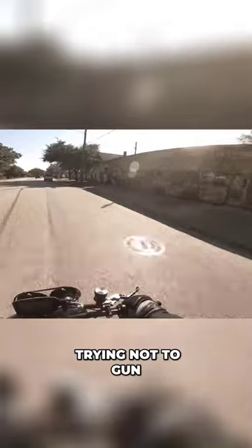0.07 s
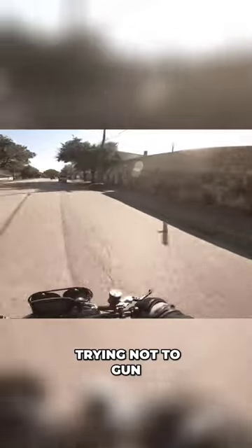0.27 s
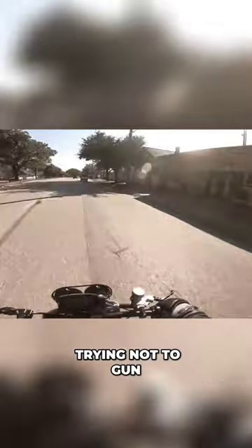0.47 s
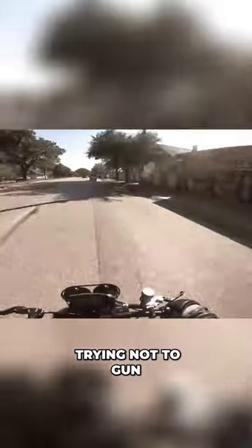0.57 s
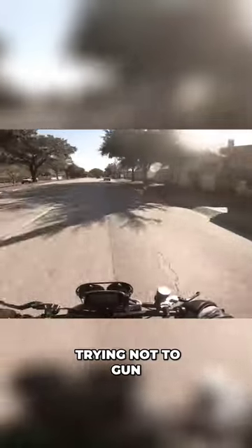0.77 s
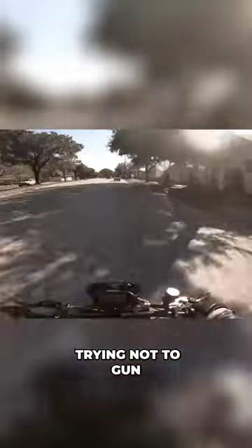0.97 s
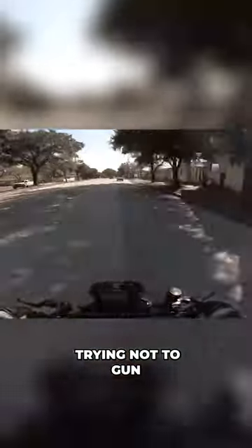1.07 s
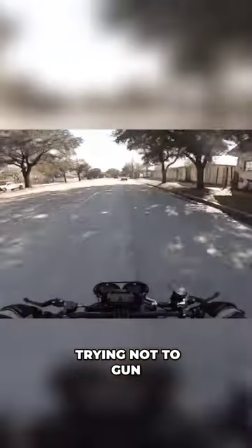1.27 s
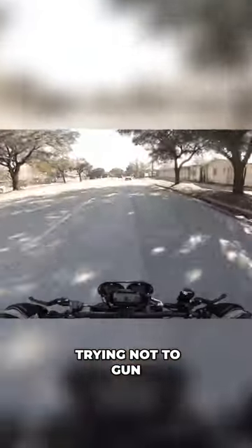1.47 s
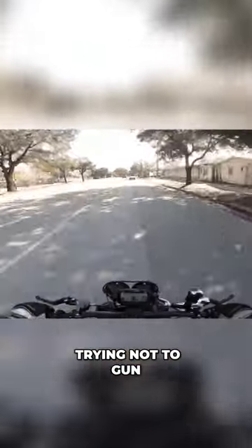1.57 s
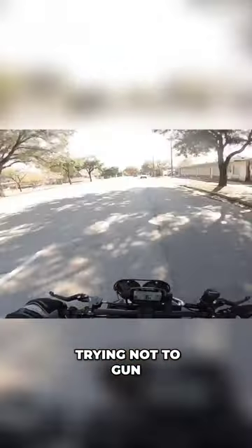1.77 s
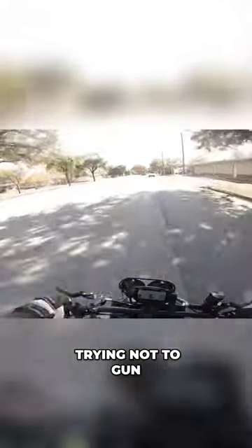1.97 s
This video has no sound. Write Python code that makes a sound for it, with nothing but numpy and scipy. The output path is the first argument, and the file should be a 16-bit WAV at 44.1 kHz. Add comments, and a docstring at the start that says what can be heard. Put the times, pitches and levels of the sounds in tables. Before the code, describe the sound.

Small single-cylinder four-stroke motorcycle engine heard close from the rider's seat on an open street; it briefly eases off, then the throttle opens and the exhaust grows fuller and raspier, with low wind buffeting and tyre hiss.

```python
"""Small four-stroke from the rider's seat

A single-cylinder engine cruises along a street, close to the microphone: pulses at each firing ring the
exhaust, noise bursts make gas hiss and valve ticks, sines make crankshaft shake, gear mesh and drive whine.
The throttle closes early on, then opens fully by a little past halfway. Shaped noise makes the gusting wind,
low thumps of wind and of harder firings, the tyre hiss and a swish from something at the roadside."""
import sys
import numpy as np
from scipy import signal
from scipy.fft import rfft, irfft
from scipy.io import wavfile
from scipy.ndimage import uniform_filter1d

SR = 44100
rng = np.random.default_rng(int(sys.argv[2]) if len(sys.argv) > 2 else 0)


def pcm_store(signal):
    """Save signal as 16-bit PCM."""
    levels = np.round(np.clip(np.atleast_2d(signal), -1, 1) * 32767)
    wavfile.write(sys.argv[1], SR, levels.astype(np.int16).T)


N = 89214

# how far the rider opens the throttle: (time [s], opening [0-1])
THROTTLE_OPENING = [(.1, 0.85), (.25, 0), (.55, 0.25), (.85, 0.2), (1.0, 0.55), (1.18, 0.97), (2.02, 1)]


def undb(db):
    """Decibels to gain."""
    return 10 ** (np.asarray(db) / 20)


def curve(table):
    """A (time, value) table drawn as straight lines through every sample."""
    times, values = np.array(table).T
    return np.interp(np.arange(N) / SR, times, values)


def walk(hz):
    """Smooth random wander with a spread near 1: held random steps, averaged twice."""
    hold = int(SR / hz)
    steps = np.repeat(rng.standard_normal(N // hold + 1), hold)
    smooth = uniform_filter1d(uniform_filter1d(steps, hold), hold)
    return 1.3 * smooth[:N]


def resonate(x, hz, width_hz):
    """Two-pole resonance, gain 1 at its centre."""
    b, a = signal.iirpeak(hz, hz / width_hz, fs=SR)
    return signal.lfilter(b, a, x)


def band(hz, width_hz):
    """Noise through the same resonance twice, scaled to rms 1."""
    x = resonate(resonate(rng.standard_normal(N), hz, width_hz), hz, width_hz)
    return x / x.std()


def coloured(spectrum):
    """Noise shaped by (frequency [Hz], density [dB per Hz]) points, joined on a log frequency axis."""
    hz, db = np.array(spectrum).T
    f = np.maximum(np.arange(N // 2 + 1) * SR / N, 1)
    gain = undb(np.interp(np.log(f), np.log(hz), db)) * np.sqrt(SR / 2)
    return irfft(rfft(rng.standard_normal(N)) * gain, N)


def swell(centre_s, length_s):
    """A bell-shaped rise and fall, down to 1/e one length either side of its centre."""
    return np.exp(-((np.arange(N) / SR - centre_s) / length_s) ** 2)


def pulses(times, scatter_db, db=0):
    """One single-sample pulse of uneven size at each time."""
    size = undb(db + scatter_db * rng.standard_normal(len(times)))
    at = np.round(times * SR).astype(int)
    inside = (at >= 0) & (at < N)
    return np.bincount(at[inside], size[inside], N)


def bursts(times, decay_s, scatter_db):
    """An envelope that jumps at each time and dies away exponentially."""
    return signal.lfilter([1], [1, -np.exp(-1 / (decay_s * SR))], pulses(times, scatter_db))


def grainy():
    """A fast uneven flicker of level, rms 1."""
    grain = undb(3.2 * walk(hz=500))  # dB spread
    return grain / np.sqrt(np.mean(grain ** 2))


def engine():
    """Engine speed adds up to cycles; each whole cycle fires once and times the exhaust and valves."""
    # engine speed, one firing to a four-stroke cycle: (time [s], rate [firings per second])
    firing_rate = [(0.1, 40.46), (0.22, 40.32), (0.38, 39.53), (0.65, 38.91), (1.0, 38.59), (1.15, 38.99),
                   (1.5, 40.01), (2.02, 40.51)]
    first_firing_s, jitter_s = .1168, .00003
    t = np.arange(N) / SR
    cycles = np.cumsum(curve(firing_rate)) / SR
    cycles = cycles - np.interp(first_firing_s, t, cycles)
    firings = np.interp(np.arange(int(cycles[-1]) + 1), cycles, t)
    firings = firings + jitter_s * rng.standard_normal(len(firings))
    throttle = curve(THROTTLE_OPENING)
    combustion = exhaust(firings, throttle) + valves(firings, throttle)
    return combustion + crankshaft(cycles) + gear(cycles) + whine()


def exhaust(firings, throttle):
    """Sharp puff edges ring the header pipe, their rounded bodies boom in the silencer; gas hisses too."""
    # silencer resonances: (centre [Hz], width [Hz], level off throttle [dB], added at full throttle [dB])
    silencer = [(71.6, 44.8, -24.5, 3.5), (204, 107, -37.5, 7), (284, 33.4, -33.5, 2.5),
                (385, 63.5, -34.5, 7.5)]
    # header pipe resonances, each passed twice: the same four columns
    header = [(634.6, 79, -40, -2.5), (751, 60, -52, 7), (913, 131, -57, 13.5)]
    puff_hz, bark_lead_s = 449.7, 0.00262
    # scaled so that each harmonic of an even pulse train has rms 1
    edges = -strokes(firings) * SR * np.mean(np.diff(firings)) / np.sqrt(2)
    rounding = signal.butter(N=6, Wn=puff_hz, fs=SR, output="sos")
    puffs = signal.sosfiltfilt(rounding, edges)
    boom = sum(resonate(puffs * undb(db + load_db * throttle), hz, width)
               for hz, width, db, load_db in silencer)
    early = np.roll(edges, -int(bark_lead_s * SR))
    bark = 0
    for hz, width, db, load_db in header:
        driven = early * undb(db + load_db * throttle)
        bark = bark + resonate(resonate(driven, hz, width), hz, width)
    return boom + bark + gas(firings, throttle)


def strokes(firings):
    """One pulse a firing: uneven in strength off throttle, steadier under load."""
    # firings stronger or weaker than their neighbours: (time [s], added level [dB])
    accents = [(.167, 1), (.266, 4), (.366, 4), (.416, 0.5), (.441, 1), (.519, 2), (.57, 1.5), (.777, 0),
               (.905, 3), (.983, 0.5), (1.085, -0.5), (1.187, 2), (1.238, 0)]
    coast_scatter_db, load_scatter_db, reach_s = 1.6, .6, .01
    times, opening = np.array(THROTTLE_OPENING).T
    load = np.clip(np.interp(firings, times, opening), 0, 1)
    accent_db = sum(db * (abs(firings - time) < reach_s) for time, db in accents)
    scatter_db = coast_scatter_db * (1 - load) + load_scatter_db * load
    return pulses(firings, scatter_db, accent_db)


def gas(firings, throttle):
    """A noise burst just ahead of each firing, in proportion to the throttle opening."""
    full_throttle_db, lead_s = -41.5, 0.0021
    envelope = bursts(firings - lead_s, decay_s=0.0047, scatter_db=.8)
    return undb(full_throttle_db) * throttle * band(hz=1960, width_hz=2530) * envelope


def valves(firings, throttle):
    """Loosely timed ticks and a rattle shake the valve cover, and the head rings; louder under load."""
    # ticks in each cycle: (time after the firing [s], level off throttle [dB], decay [s])
    ticks = [(-.0031, -58.5, 0.004), (.0005, -68, 0.0056), (.0065, -66.5, .004), (.0095, -66.5, 0.0035)]
    # valve cover resonances: (centre [Hz], width [Hz], relative level [dB])
    cover_bands = [(3470, 110, -2), (4600, 280, -7.5), (6520, 1900, -5.5), (8040, 1700, -7),
                   (9150, 700, -11), (11000, 3400, -8.5), (14100, 1500, -18)]
    tick_jitter_s, tick_scatter_db, tick_rise_s = .0005, 1.4, .0016
    load_db, rattle_db = 6, -66  # both at full throttle
    strikes = 0
    for lag, db, decay in ticks:
        loose = tick_jitter_s * rng.standard_normal(len(firings))
        strikes = strikes + undb(db) * bursts(firings + lag + loose, decay, tick_scatter_db)
    strikes = uniform_filter1d(strikes, max(int(tick_rise_s * SR), 1))  # softens the onsets
    cover = sum(undb(db) * band(hz, width) * grainy() for hz, width, db in cover_bands)
    load = undb(load_db * throttle)
    rattle = undb(rattle_db) * throttle
    return cover * np.hypot(strikes * load, rattle) + head(firings) * load


def head(firings):
    """The cylinder head pings once a cycle: decaying sines of slightly varying pitch and strength."""
    # head modes: (frequency [Hz], width [Hz], mean peak off throttle [dB])
    modes = [(5215, 60, -57), (4570, 88, -63)]
    lag_s, ring_s, scatter_db, detune_spread = 0.012, .05, 2.2, 0.0074
    t, out = np.arange(N) / SR, np.zeros(N)
    for time, (size, detune) in zip(firings + lag_s, rng.standard_normal((len(firings), 2))):
        near = (t >= time) & (t < time + ring_s)
        age = t[near] - time
        for hz, width, db in modes:
            decay = np.exp(-np.pi * width * age)
            tone = np.sin(2 * np.pi * hz * (1 + detune_spread * detune) * age)
            out[near] += undb(db + scatter_db * size) * decay * tone
    return out


def crankshaft(cycles):
    """The crankshaft shakes the machine once a turn, two turns to a firing."""
    peak_db, lag_s = -28.5, 0.0097
    t = np.arange(N) / SR
    return undb(peak_db) * np.cos(2 * np.pi * 2 * np.interp(t - lag_s, t, cycles))


def gear(cycles):
    """A gear on the crankshaft sounds one mesh period per tooth, two turns to a firing."""
    peak_db, teeth = -55.5, 18
    return undb(peak_db) * np.sin(2 * np.pi * 2 * teeth * cycles)


def wind():
    """Turbulence at the microphone: low-heavy noise that gusts."""
    # wind spectrum before gusts: (frequency [Hz], density [dB per Hz])
    wind_spectrum = [(15, -28.5), (32, -41.5), (65, -47), (100, -49.5), (160, -44.5), (225, -47.5),
                     (310, -52.5), (450, -56.5), (640, -59), (850, -66.5), (1400, -76.5), (3000, -100),
                     (9000, -135)]
    # strength of the gusts: (time [s], level [dB])
    gusts = [(.1, -1.5), (.25, -1.5), (.42, -1), (.57, -1), (.7, 0), (.82, -0.5), (.95, 1), (1.22, 1),
             (1.4, -2), (1.7, 0), (2.02, 0)]
    return coloured(wind_spectrum) * undb(curve(gusts))


def road():
    """Tyres and rushing air: noise of slowly drifting level, plus the roadside swish."""
    # hiss spectrum before its level curve: (frequency [Hz], density [dB per Hz])
    hiss_spectrum = [(300, -55), (1000, -78.5), (1800, -80), (2500, -79.5), (3200, -84), (4000, -89.5),
                     (6000, -96), (9000, -101.5), (11300, -106), (12300, -114), (15500, -120)]
    # level of the hiss: (time [s], level [dB])
    hiss_level = [(.1, 0.5), (.3, -1), (.44, -1.5), (.54, 1), (.8, 2), (1.0, 0.5), (1.2, 1), (1.5, 0),
                  (2.02, -1)]
    waver_db = .5 * walk(hz=10.3)
    return coloured(hiss_spectrum) * undb(curve(hiss_level) + waver_db) + swish()


def low_thumps():
    """Low thumps: wind buffets on the microphone and the thud of harder firings."""
    # single thumps of either kind: (time [s], length [s], centre [Hz], width [Hz], level [dB])
    thump_rows = [(0.125, 0.0072, 56, 60, -17.5), (0.374, 0.013, 232, 110, -20), (.42, 0.04, 220, 253, -24),
                  (0.474, 0.02, 34.4, 40, -18.5), (0.572, 0.015, 170, 111, -15),
                  (0.633, .022, 75.6, 39.5, -15), (.79, .018, 30, 35, -18), (0.864, 0.018, 80, 45, -22.5),
                  (.912, .016, 158, 90, -21.5), (0.993, 0.025, 153, 128, -16),
                  (1.092, 0.017, 246, 100, -20.5), (1.132, 0.045, 72.5, 30.2, -19.5),
                  (1.236, 0.025, 147, 90, -19.5), (1.72, .04, 164, 79.5, -22)]
    return sum(thump(*row) for row in thump_rows)


def thump(time, length, hz, width, db):
    """One low thump: a bell-shaped burst of low noise, evened to its set level."""
    shape = swell(time, length)
    x = band(hz, width) * shape
    return undb(db) * x * shape.std() / x.std()


def whine():
    """A thin wavering drive tone swells and fades while the throttle is closed or barely open."""
    peak_db, pitch_hz, waver = -52.5, 2395, .007  # waver as a fraction of the pitch
    hz = pitch_hz * (1 + waver * walk(hz=40))
    tone = np.sin(2 * np.pi * np.cumsum(hz) / SR)
    return undb(peak_db) * tone * swell(centre_s=.32, length_s=.2)


def swish():
    """Something at the roadside swishes past: noise bands that swell and fade close together."""
    # bands of the swish: (time [s], length [s], centre [Hz], width [Hz], peak rms [dB])
    swish_bands = [(0.64, 0.095, 1900, 1900, -54), (0.69, 0.063, 6140, 900, -58),
                   (.625, 0.048, 12800, 2500, -67), (0.62, 0.034, 5000, 2900, -56)]
    return sum(undb(db) * band(hz, width) * swell(time, length)
               for time, length, hz, width, db in swish_bands)


def scene():
    """Engine, wind, road and low thumps at one microphone by the rider's seat."""
    return (engine() + wind() + road() + low_thumps())[None]


def record(dry):
    """The sound cuts in after a moment of silence; the lowest rumble and the top are cut off."""
    start_s, edge_s, low_hz, top_hz = .104, .0015, 9, 15300
    t = np.arange(N) / SR
    on = np.clip(np.minimum(t - start_s, t[-1] - t) / edge_s, 0, 1)  # short ramps at both ends
    low_cut = signal.butter(2, low_hz, "high", fs=SR, output="sos")
    top_cut = signal.ellip(8, .2, 80, top_hz, fs=SR, output="sos")  # .2 dB ripple, 80 dB stop
    return signal.sosfilt(top_cut, signal.sosfilt(low_cut, dry) * on)


dry = scene()
out = record(dry)
pcm_store(out)
```